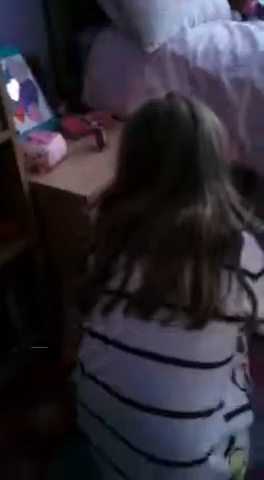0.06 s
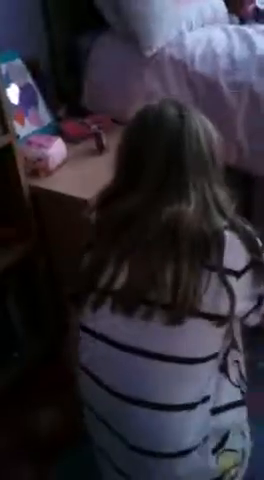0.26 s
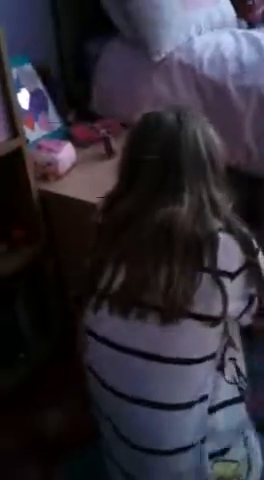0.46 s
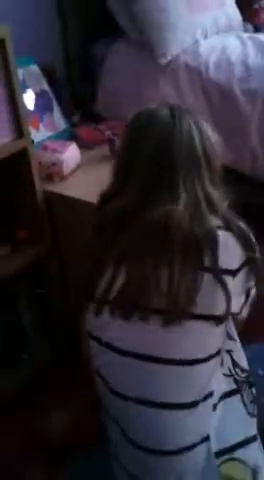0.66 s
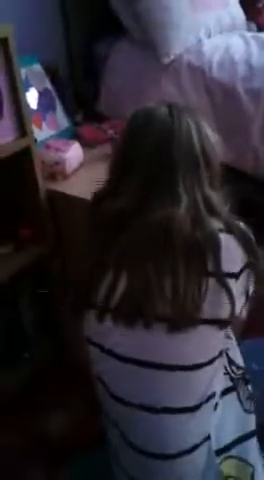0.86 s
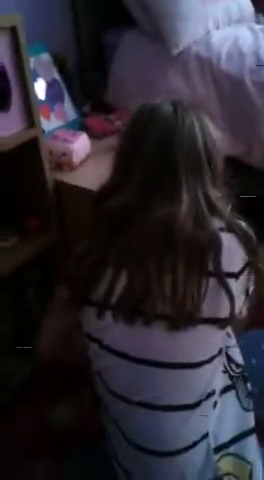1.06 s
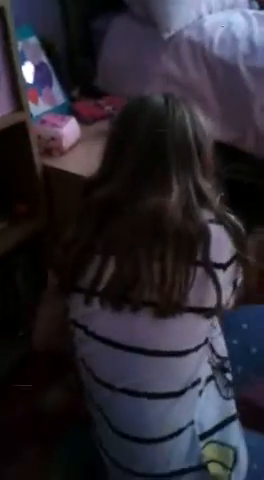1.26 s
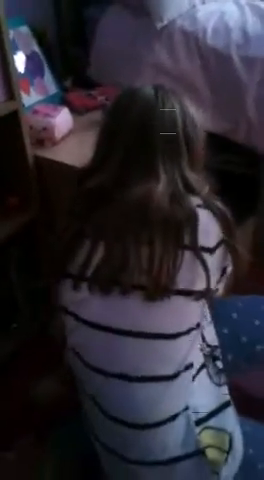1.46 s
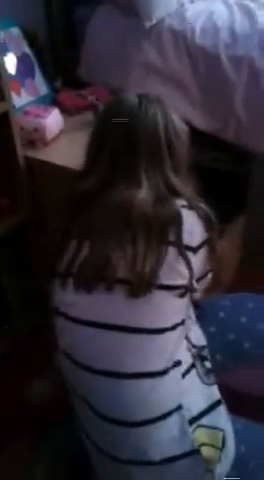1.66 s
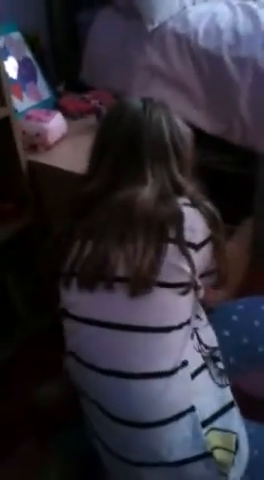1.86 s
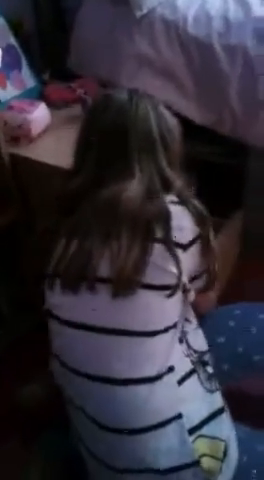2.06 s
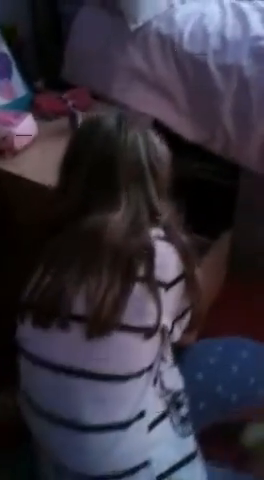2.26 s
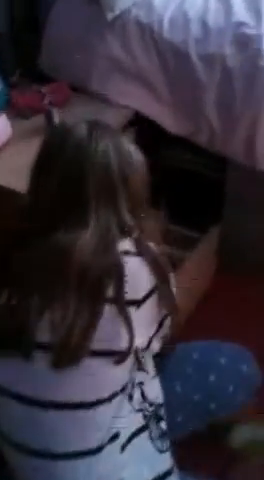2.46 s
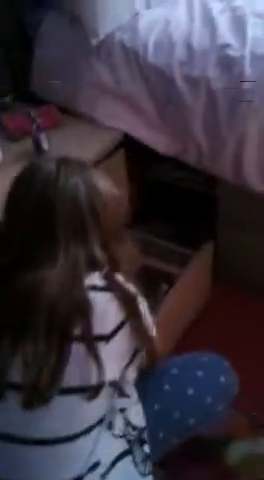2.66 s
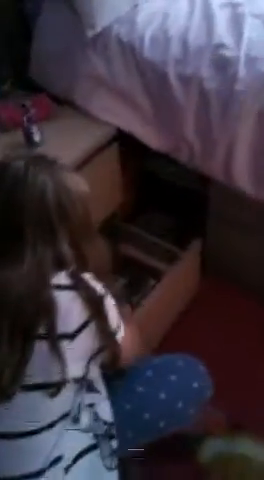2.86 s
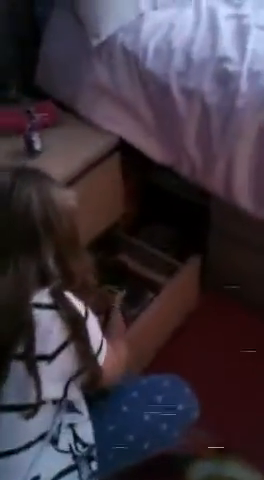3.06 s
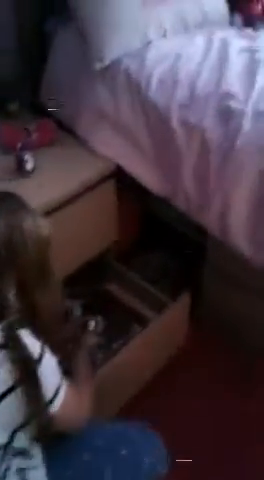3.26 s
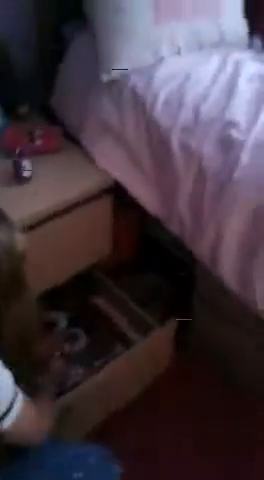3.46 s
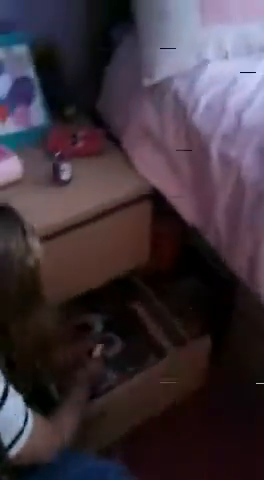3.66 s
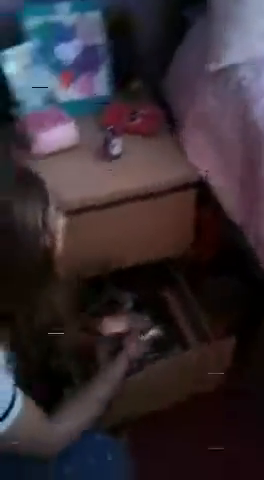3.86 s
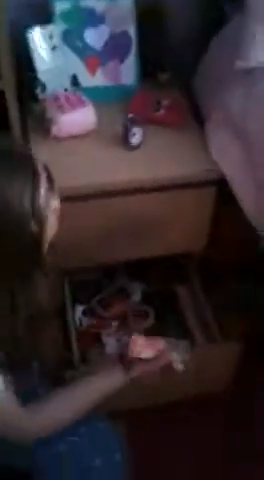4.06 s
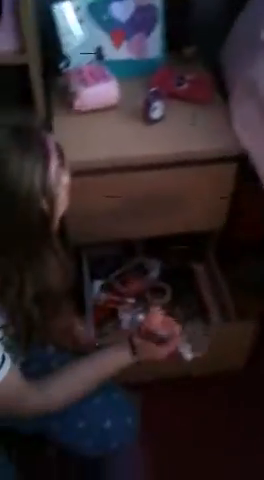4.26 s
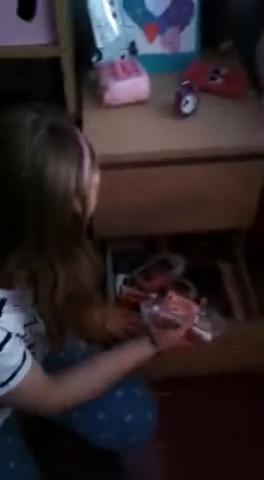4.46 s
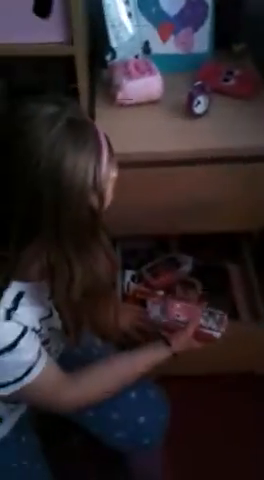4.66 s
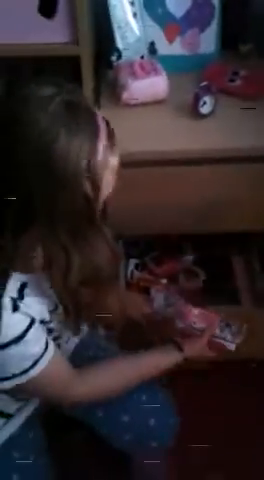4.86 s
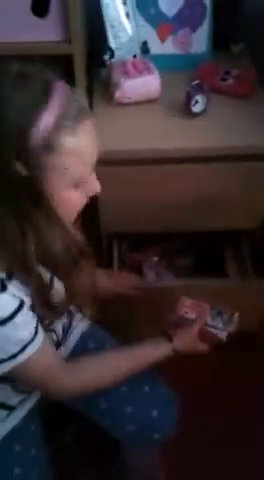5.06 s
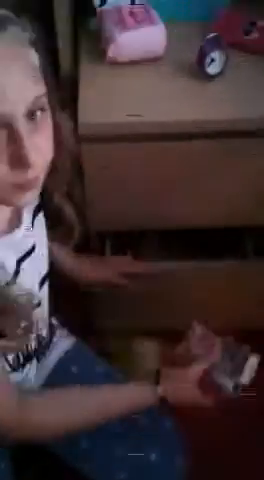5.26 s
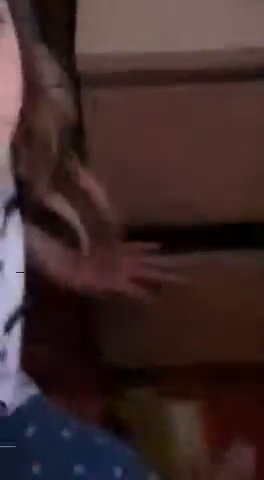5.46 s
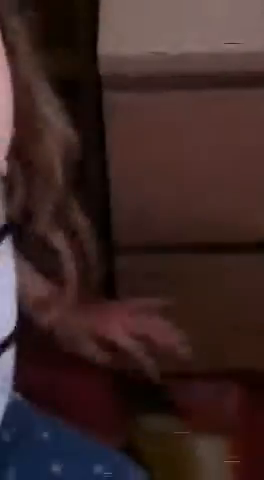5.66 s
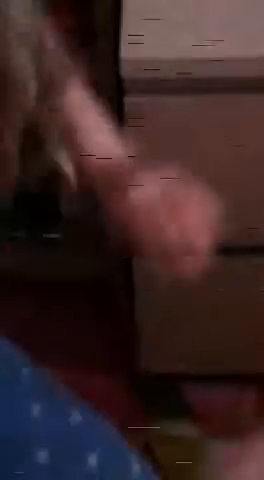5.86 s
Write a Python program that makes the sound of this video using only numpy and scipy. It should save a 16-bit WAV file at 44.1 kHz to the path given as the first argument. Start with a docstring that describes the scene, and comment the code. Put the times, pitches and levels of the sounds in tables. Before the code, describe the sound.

A wooden drawer bangs against its stop, small things rustle and crinkle inside, then it slides shut with a deep thud.

```python
"""Wood rubs and creaks under microphone hiss as a hand rummages in a wooden drawer in a quiet bedroom.
The drawer bangs on its metal stop, then hums on its runners, slides home and thuds against the cabinet.
Rub, rustle and hiss are shaped noise; bumps, bang and thud are damped modes; crinkles are resonant bursts.
A decaying noise tail gives the room's reverberation, and short ticks reach the microphone without it."""
import sys
import numpy as np
from scipy import signal
from scipy.fft import rfft, irfft, next_fast_len
from scipy.io import wavfile
from scipy.ndimage import uniform_filter1d, map_coordinates

SR = 44100
rng = np.random.default_rng(int(sys.argv[2]) if len(sys.argv) > 2 else 0)


def file_out(sig):
    """Save sig as 16-bit WAV at sys.argv[1]."""
    # one column per channel
    cols = np.atleast_2d(sig).T
    # limit, then scale
    lim = np.clip(cols, -1, 1)
    pcm = np.round(lim * 32767).astype(np.int16)
    wavfile.write(sys.argv[1], SR, pcm)


def field_ratio(decibels):
    """Amplitude ratio for a level in dB (20 dB per decade); scalars and array-likes work."""
    return 10 ** (np.asarray(decibels, dtype=float) / 20)


N = 260763  # length in samples


def unit(x):
    """Normalisation: the signal is scaled to rms 1."""
    return x / np.sqrt(np.mean(x ** 2) + 1e-20)


def coloured(x, points, patchy_db=0):
    """Spectral shaping: patches of random gain, then a filter through (f/Hz, gain/dB) points, at rms 1."""
    z = signal.stft(x, nperseg=512)[2]
    field = uniform_filter1d(rng.standard_normal(z.shape), size=5, axis=0)
    field = uniform_filter1d(field, size=7, axis=1)
    patchy = signal.istft(z * field_ratio(patchy_db * unit(field)), nperseg=512)[1][:len(x)]
    m = next_fast_len(len(patchy) + 8192)
    f, db = np.transpose(points)
    log_f = np.log(np.fft.rfftfreq(m, 1 / SR) + 1)
    gain = field_ratio(np.interp(log_f, np.log(f + 1), db))
    return unit(irfft(rfft(patchy, m) * gain, m)[:len(patchy)])


def wobble(rate):
    """Random modulation: a smooth curve through rate random knots a second."""
    return map_coordinates(rng.standard_normal(N // 100), [np.arange(N) * rate / SR])


def gritty(grit_db, rate):
    """Amplitude modulation: white noise whose strength jumps about."""
    return rng.standard_normal(N) * field_ratio(grit_db * wobble(rate))


def ring(modes, tilt_db=0, scatter_db=0, blur=0):
    """Modal superposition: damped sines; loose joints blur each phase (rad per root second and kHz)."""
    hz, db, t60 = np.transpose(modes)[..., None]
    t = np.arange(SR // 3) / SR
    level = db + tilt_db + scatter_db * rng.standard_normal(db.shape)
    walk = np.cumsum(rng.standard_normal((len(hz), len(t))), axis=1) / np.sqrt(SR)
    drift = blur * hz / 1000 * walk
    return np.sum(field_ratio(level - 60 * t / t60) * np.sin(2 * np.pi * hz * t + drift), axis=0)


def add(track, s, sound):
    """Linear superposition: the sound is mixed into the track at time s."""
    part = track[round(s * SR):][:len(sound)]
    part += sound[:len(part)]


def high_pass(x, hz):
    """High-pass filtering: a second-order filter weakens what lies below hz."""
    return signal.sosfilt(signal.butter(2, hz, "high", fs=SR, output="sos"), x)


# reverberation of the bedroom: f/Hz, t60/s
ROOM_DECAY = [(150, 0.14), (1000, 0.14), (4000, 0.15), (12000, 0.084)]


def room(x):
    """Reverberation: the source convolved with noise in which each frequency decays at its own rate."""
    hz, t, z = signal.stft(rng.standard_normal(SR // 2), SR, nperseg=256)
    f, t60 = np.transpose(ROOM_DECAY)
    decay = field_ratio(-60 * t / np.interp(hz, f, t60)[:, None])
    tail = signal.istft(z * decay, SR, nperseg=256)[1]
    delayed = np.pad(x, (200, 0))  # delay in samples
    return signal.fftconvolve(delayed, tail / np.linalg.norm(tail))[:N]


# steady sounds before random modulation: t/s, low wooden noise level/dB (including the thud's tail
# at 5.55 s), microphone hiss level/dB
STEADY_LEVELS = [(0.0, -54.5, -58.5), (0.25, -59.5, -56.5), (0.39, -55.5, -62), (0.52, -74.5, -68),
                 (0.62, -55.5, -61), (0.86, -70.5, -67.5), (1.07, -60, -66), (1.5, -76.5, -71),
                 (1.89, -67, -71.5), (2.53, -69, -68), (2.8, -75.5, -74.5), (3.0, -68, -68),
                 (3.13, -64, -66), (3.74, -64, -63.5), (4.11, -64, -67.5), (4.211, -75, -72.5),
                 (4.41, -65.5, -66), (4.66, -56.5, -67), (4.95, -50.5, -67), (5.1, -56.5, -68),
                 (5.25, -61.5, -69), (5.45, -62, -67), (5.55, -40, -61), (5.65, -64, -63),
                 (5.91, -71, -72.5)]
# spectrum of the low room rumble: f/Hz, relative level/dB
RUMBLE_SPECTRUM = [(12, -41), (20, -15), (102, 3), (171, -6), (188, -3), (226, -6.5), (260, -12.5),
                   (340, -42), (570, -120)]
# spectrum of the low wooden noise: f/Hz, relative level/dB
WOODEN_SPECTRUM = [(76, -32), (130, -2), (254, -6), (371, -4), (430, -8), (485, -5), (744, -11.5),
                   (1150, -10.5), (2400, -28), (3120, -62), (5280, -120)]
# spectrum of the rustle: f/Hz, relative level/dB
RUSTLE_SPECTRUM = [(760, -32), (1300, -0.5), (1620, 2.5), (1720, 0.5), (2180, 0.5), (2870, -1), (6000, -7),
                   (7800, -32.5), (13200, -120)]
# spectrum of the microphone hiss: f/Hz, relative level/dB
HISS_SPECTRUM = [(2650, -31), (4500, -4.5), (4970, -8), (6910, 0.5), (8210, 2.5), (9760, -0.5),
                 (13900, -6.5), (14900, -21), (15700, -19.5)]


def background():
    """Shaped noise: wooden noise and microphone hiss follow level curves, rustle follows both; rumble stays."""
    s, *levels = np.transpose(STEADY_LEVELS)
    wooden_db, hiss_db = [np.interp(np.arange(N) / SR, s, level) for level in levels]
    # dB of rustle gained per dB of wooden noise and of hiss
    rustle_db = -70.5 + 0.4 * (wooden_db - wooden_db.mean()) + 0.84 * (hiss_db - hiss_db.mean())
    sway = wobble(11)  # random level wobble shared by wooden noise, rustle and hiss
    rumble = field_ratio(-67.5 + 4.5 * wobble(10)) * coloured(rng.standard_normal(N), RUMBLE_SPECTRUM)
    wooden = field_ratio(wooden_db + 1.1 * sway) * coloured(gritty(2, 160), WOODEN_SPECTRUM, patchy_db=1.4)
    rustle = field_ratio(rustle_db + 1.2 * sway) * coloured(gritty(0.73, 200), RUSTLE_SPECTRUM, patchy_db=1.5)
    hiss = field_ratio(hiss_db + 0.7 * sway) * coloured(gritty(1.4, 380), HISS_SPECTRUM)
    return rumble + wooden + rustle + hiss


# low hum of the runners, then a swell just before the thud: t/s, level/dB
HUM_LEVEL = [(4.33, -88), (4.39, -66), (5.43, -60), (5.489, -47)]
# spectrum of the hum and swell: f/Hz, relative level/dB
HUM_SPECTRUM = [(60, -40.5), (100, -6), (125, 1.5), (155, -2), (260, -39.5)]


def runner_hum():
    """Narrow-band noise: the runners hum low, and the same band swells just before the thud."""
    s, db = np.transpose(HUM_LEVEL)
    level = np.interp(np.arange(N) / SR, s, db, left=-120, right=-120)
    return field_ratio(level) * coloured(rng.standard_normal(N), HUM_SPECTRUM)


# creaks of wood on wood: start t/s, end t/s, first f/Hz, last f/Hz, level/dB before roughening
CREAK_GLIDES = [(.1, .135, 880, 960, -61), (.165, .225, 1080, 1180, -55), (.24, .26, 1000, 980, -57),
                (1.9, 1.97, 275, 165, -56), (2.88, 2.92, 830, 850, -68), (3.89, 3.94, 840, 820, -62),
                (5.875, 5.91, 830, 830, -65)]


def creaks():
    """Frequency glide: soft tones of wood on wood, roughened by random amplitude modulation."""
    out = np.zeros(N)
    for start, end, first_hz, last_hz, db in CREAK_GLIDES:
        u = np.linspace(0, 1, round((end - start) * SR))
        hz = first_hz + (last_hz - first_hz) * u
        tone = np.sin(2 * np.pi * np.cumsum(hz) / SR)
        add(out, start, field_ratio(db) * np.sin(np.pi * u) * tone)
    return out * field_ratio(4 * wobble(150))


# spectrum of the tiny snaps: f/Hz, relative level/dB
SNAP_SPECTRUM = [(880, -28), (1500, -5), (2480, -2), (3930, -6.5), (5350, -6.5), (7210, -4.5), (9820, -4.5),
                 (13500, -17), (14300, -30), (15000, -69.5)]
# wrappers and small plastic things: t/s, relative level/dB, ringing f/Hz, relative ringing level/dB, t60/s
CRINKLE_EVENTS = [(0.322, -40.5, 2330, 10, 0.25), (0.36, -38.5, 2100, 9, 0.073),
                  (0.571, -46.5, 2330, 3, 0.08), (0.7826, -45.5, 2440, 0, 0.37),
                  (1.0146, -34.5, 2490, 1, 0.091), (1.032, -39.5, 5160, 14, 0.064),
                  (1.165, -43.5, 7400, 1, .15), (1.588, -55, 9050, -6, 0.32), (1.8974, -55, 8800, -8, 0.56),
                  (1.9814, -57, 2230, -1, 0.22), (2.1705, -58, 2290, 5.5, 0.15),
                  (2.331, -52.5, 2460, 4, 0.14), (2.618, -51.5, 2250, 7, 0.52),
                  (2.6434, -47, 3180, 12, 0.091), (2.9537, -50, 2550, 0, 0.12),
                  (3.042, -48.5, 7900, 14, 0.19), (3.1454, -49, 8250, -7, 0.1),
                  (3.165, -44, 7200, -2, 0.18), (3.1986, -46.5, 3200, 25, 0.057),
                  (3.262, -51.5, 2320, 9, 0.54), (3.315, -40.5, 3110, 13, 0.091),
                  (3.445, -42.5, 2480, -18, 0.14), (3.5587, -49.5, 8360, -3, 0.084),
                  (3.649, -47, 7700, 0, 0.072), (3.734, -56, 2270, 19, 0.25),
                  (3.8137, -27.5, 5730, 14, .04), (3.823, -36, 7620, 2, 0.11),
                  (4.129, -54, 9150, 1.5, 0.17), (4.3914, -54, 7660, 17, 0.4),
                  (4.4894, -48, 7400, 11, 0.071), (4.63, -49, 4100, 18, 0.061), (4.66, -48, 3900, 22, .12),
                  (4.6994, -49, 4520, 2, 0.18), (4.735, -56, 4200, 17, 0.21),
                  (4.788, -44.5, 4200, 16, 0.077), (5.4884, -34, 2210, -10, 0.073),
                  (5.5034, -32, 2400, 10, 0.14), (5.652, -47.5, 2250, 2, 0.09),
                  (5.7573, -46, 2650, 6, 0.076)]


def crinkles():
    """Resonance under noise excitation: bursts of snaps ring small things; fainter ones come at random."""
    out, t = np.zeros(N), np.arange(SR // 4) / SR
    draws = rng.random((60, 4))
    faint = [(a * N / SR, -62 + 9 * b, 1800 * 5 ** c, 9.5, 0.018 + 0.04 * d) for a, b, c, d in draws]
    snaps = np.pad(coloured(gritty(1.3, 500), SNAP_SPECTRUM, patchy_db=3.5), (0, len(t)))
    rise = 1 - np.exp(-t / 0.0038)
    for s, db, hz, ring_db, t60 in CRINKLE_EVENTS + faint:
        burst = snaps[round(s * SR):][:len(t)]
        ringing = 0
        for k in (1, 2.2):  # a stiff piece has an overtone
            b, a = signal.iirpeak(min(k * hz, SR / 3), 12 * k, SR)
            ringing = ringing + signal.lfilter(b, a, burst) / k
        envelope = rise * field_ratio(-60 * t / t60)
        add(out, s, field_ratio(db - 6.5) * envelope * unit(burst + field_ratio(ring_db) * ringing))
    return out


# finger ticks on the phone case: t/s, relative level/dB, f/Hz, decay constant/s
FINGER_TICKS = [(4.625, -28.5, 1240, 0.00018), (5.3043, -26, 1500, 0.00015)]


def ticks():
    """Heavily damped oscillation: brief ticks straight into the microphone, each with a treble snap."""
    out, t = np.zeros(N), np.arange(300) / SR
    snap = 0.22 * np.sin(2 * np.pi * 9200 * t) * np.exp(-t / 0.0003)
    for s, db, hz, length in FINGER_TICKS:
        pulse = -2.7 * np.sin(2 * np.pi * hz * t) * t / length * np.exp(-t / length)
        add(out, s, field_ratio(db) * (pulse + snap))
    return out


# things bumping the drawer: t/s, peak level/dB before the high-pass, loudest wood f/Hz,
# contact/s (4 ms is added in use)
BUMP_EVENTS = [(0.328, -39, 393, 0.01), (0.349, -29, 350, .003), (0.368, -30, 350, .003),
               (0.572, -44.5, 571, 0.0039), (0.649, -30, 950, .0045), (0.689, -39.5, 443, 0.0085),
               (0.712, -38, 560, 0.011), (0.733, -38.5, 424, 0.012), (0.787, -42, 345, 0.026),
               (0.83, -34.5, 530, 0.004), (1.086, -47, 342, 0.0048), (1.165, -36, 810, 0.0062),
               (1.218, -51.5, 376, 0.015), (1.346, -52, 404, 0.014), (1.497, -45.5, 366, 0.0087),
               (1.515, -42.5, 353, .01), (1.98, -44, 1520, .002), (1.992, -43, 1120, 0.0021),
               (2.173, -44, 1000, 0.0037), (2.33, -54.5, 361, 0.0066), (2.524, -51, 314, 0.0046),
               (2.586, -54, 373, 0.011), (2.619, -43, 650, .01), (2.643, -46, 379, 0.014),
               (3.146, -46, 341, 0.008), (3.166, -37, 584, 0.01), (3.2, -43, 333, 0.0085),
               (3.269, -56, 370, 0.013), (3.309, -40, 710, 0.0068), (3.318, -34.5, 890, 0.00066),
               (3.559, -52, 371, 0.0028), (3.817, -35.5, 1310, 0.0012), (4.059, -52.5, 1390, 0.004),
               (4.391, -46.5, 886, 0.0052), (4.49, -56, 900, 0.0058), (4.798, -40.5, 397, 0.0055),
               (4.954, -48, 1130, .006), (5.064, -42, 350, 0.0029), (5.44, -48.5, 336, 0.0078),
               (5.648, -48.5, 596, 0.0067), (5.758, -52, 1490, 0.0046)]
# modes of the drawer box: f/Hz, relative level/dB, t60/s before each bump's extra damping
WOOD_MODES = [(183, -17.5, 0.099), (249, 0.5, 0.11), (282, -13.5, 0.04), (351.5, 2.5, 0.069),
              (416, 5, 0.022), (530, 1.5, 0.048), (586, -6.5, 0.15), (673, 7, 0.073), (795, 2.5, 0.069),
              (797.4, -2.5, 0.24), (934, -2, .07), (957, -1.5, 0.093), (1117, 7.5, 0.045),
              (1284, 7.5, 0.066), (1386, -0.5, 0.14), (1570, -0.5, 0.029), (1850, 6, .05)]


def bumps():
    """Impact excitation: a tap and rough contact drive modes near one pitch; fainter ones come at random."""
    out, t = np.zeros(N), np.arange(SR // 3) / SR
    wood_hz = np.array(WOOD_MODES)[:, :1]
    faint = [(a * N / SR, -63 + 8 * b, 300 * 4 ** c, 0.008) for a, b, c in rng.random((14, 3))]
    for s, db, hz, contact in BUMP_EVENTS + faint:
        contact = contact + 0.004
        push = rng.standard_normal(len(t)) * np.exp(-t / contact) * (1 - np.exp(-3 * t / contact))
        push[0] = field_ratio(22.5 - 1100 * contact)  # brief contacts start with a stronger clean tap
        octaves = np.log2(wood_hz / hz)
        tilt_db = 12 * octaves.clip(max=0) - 22 * octaves.clip(0)  # fall-off below and above, dB per octave
        body = ring(WOOD_MODES, tilt_db, scatter_db=2.5, blur=15)
        fall_30db = 0.12 * np.sqrt(500 / hz)  # s for 30 dB of extra damping; lower bumps last longer
        knock = signal.fftconvolve(push, body * field_ratio(-30 * t / fall_30db))[:len(t)]
        add(out, s, field_ratio(db) * knock / np.abs(knock).max())
    return out


def slam(blows, modes, crack_db, crack_t60, rise):
    """Impact response: blows ring shared modes and rattle loose contents; soft ones lack high modes."""
    out, t = np.zeros(N), np.arange(SR // 3) / SR
    spectrum = [(100, -24), (500, 10.5), (2000, -13), (8000, -19.5), (12000, -24), (13500, -60.5)]
    rattle = coloured(gritty(1.3, 330), spectrum)
    octaves = np.log2(np.array(modes)[:, :1] / 500).clip(0)  # above 500 Hz
    for s, db, soft_db in blows:
        crack = field_ratio(crack_db - 3 * soft_db - 60 * t / crack_t60) * rattle[round(s * SR):][:len(t)]
        body = ring(modes, -soft_db * octaves, scatter_db=1.1, blur=2.5)
        add(out, s, field_ratio(db) * (1 - np.exp(-t / rise)) * (body + crack))
    return out


# drawer front meeting the cabinet: t/s, relative level/dB, softness/dB per octave
CABINET_BLOWS = [(5.4925, -13, 0), (5.499, -33, -7), (5.5065, -20.5, 2), (5.516, -31, -2.5),
                 (5.541, -34.5, 1), (5.556, -43, 5)]
# modes of the cabinet: f/Hz, relative level/dB, t60/s
CABINET_MODES = [(91.5, -22.5, 0.22), (126, -17, 0.082), (185.9, -1.5, 0.2), (239.5, -3.5, 0.14),
                 (281, -13, 0.17), (393.2, -3, 0.13), (400, -31, 0.057), (500.5, -19.5, 0.076),
                 (668, -30, 0.13), (745, -4.5, 0.042), (1004, -12, 0.052), (1130, -7.5, 0.037),
                 (1278, -7, 0.039), (1417, -5, 0.025), (1777, -21.5, 0.086), (2100, -31.5, 0.052),
                 (2180, -8.5, 0.021)]


def cabinet_thud():
    """Modal response of the cabinet: the drawer front strikes it in a train of blows."""
    return slam(CABINET_BLOWS, CABINET_MODES, crack_db=-17, crack_t60=0.11, rise=0.0029)


# drawer bouncing on its stop: t/s, relative level/dB, softness/dB per octave
BOUNCES = [(.6012, -12, -1), (.6065, -24, 6), (.6115, -24, 5.5), (.635, -31.5, 4), (.651, -32.5, 2),
           (.831, -30, 5.5)]
# modes of the panel and metal runner: f/Hz, relative level/dB, t60/s
STOP_MODES = [(187, -38, 0.32), (300, -19.5, 0.13), (431, -9.5, 0.2), (528, 3, .045), (565, 0, .045),
              (735, -3, .075), (781, -11, .08), (885, -10, .06), (1037, -19.5, 0.14), (1080, -14.5, 0.063),
              (1252, -13.5, 0.046), (1246, -5, 0.018), (1230, -22.5, .05), (1630, -12.5, 0.04),
              (1930, -27, 0.12), (2046, -17, 0.1), (2250, -27.5, 0.096), (3047, -22, .15), (3601, -21, .08),
              (3752, -25, .07), (4520, -38.5, 0.037), (4912, -31.5, 0.09), (5410, -38.5, .05),
              (5740, -21, 0.059), (6500, -28, 0.065), (8200, -34.5, 0.16)]


def stop_bang():
    """Modal response of panel and metal runner: the drawer bounces on its stop."""
    return slam(BOUNCES, STOP_MODES, crack_db=-10, crack_t60=0.089, rise=0.0016)


def scene():
    """Superposition of direct and reverberant sound; a gated, delayed copy of the mix adds stereo noise."""
    bang = high_pass(stop_bang(), 170.7)
    thud = high_pass(high_pass(cabinet_thud(), 75), 75)
    loud = bang + thud
    small = high_pass(bumps(), 192) + crinkles()
    quiet = small + field_ratio(-6.5) * room(small) + creaks() + runner_hum() + background()
    copy = quiet + field_ratio(-21) * loud
    bright = copy + 1.5 * high_pass(copy, 1800)
    gate = np.clip(3 * wobble(14) - 0.6, 0, 1)  # opens at random
    side = field_ratio(-22) * np.roll(bright, 700) * gate  # delayed by 700 samples, opposite in the two channels
    middle = loud + field_ratio(-14) * room(loud) + ticks() + quiet
    return middle + np.array([side, -side])


def band_limit(x):
    """A steep low-pass at the top of the band."""
    return signal.sosfilt(signal.butter(12, 15850, fs=SR, output="sos"), x)


def record(dry):
    """Transmission: the finished mix passes through the phone."""
    return band_limit(dry)


dry = scene()
out = record(dry)
file_out(out)
```